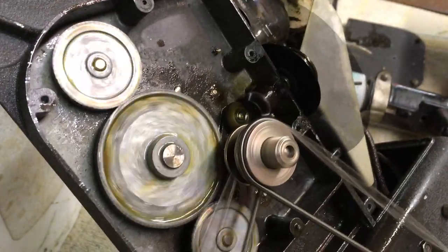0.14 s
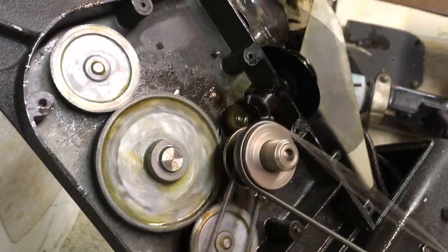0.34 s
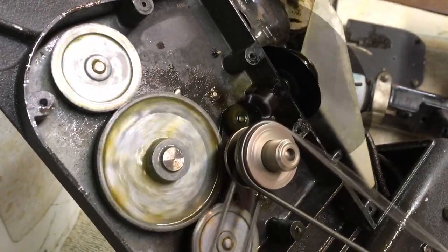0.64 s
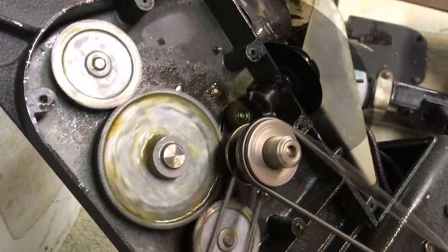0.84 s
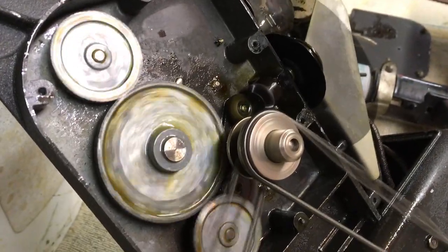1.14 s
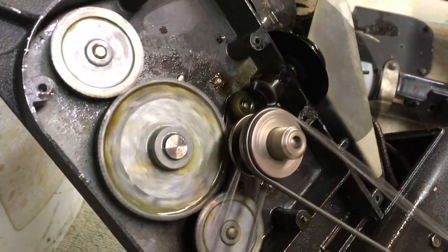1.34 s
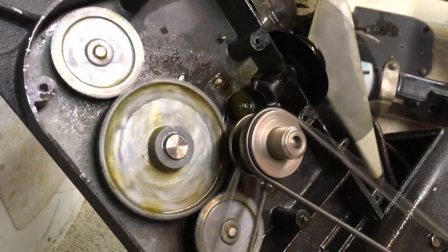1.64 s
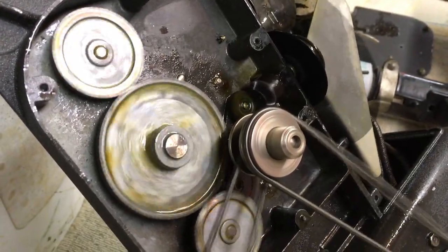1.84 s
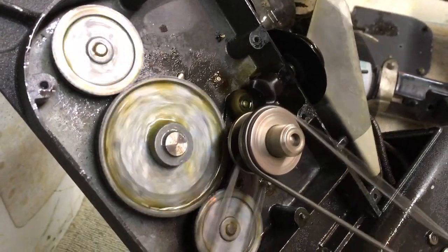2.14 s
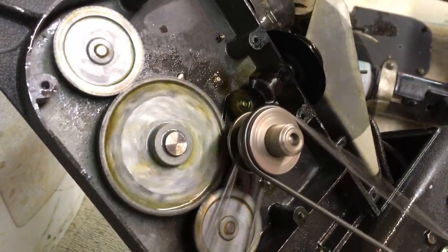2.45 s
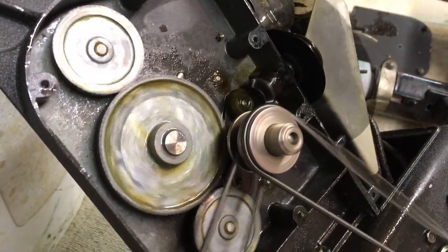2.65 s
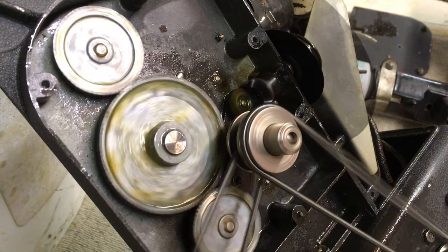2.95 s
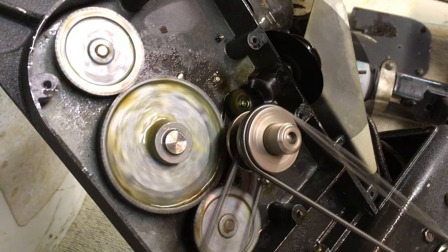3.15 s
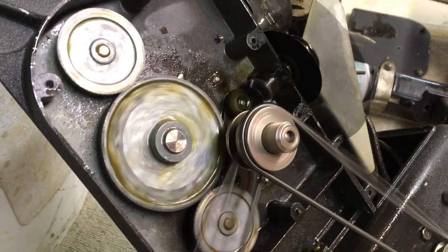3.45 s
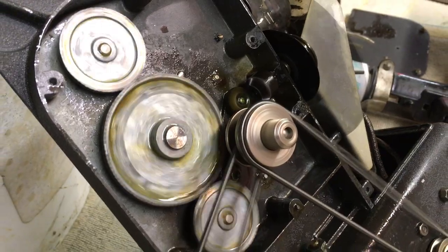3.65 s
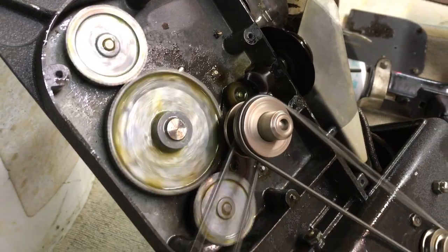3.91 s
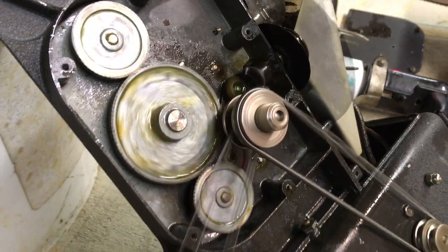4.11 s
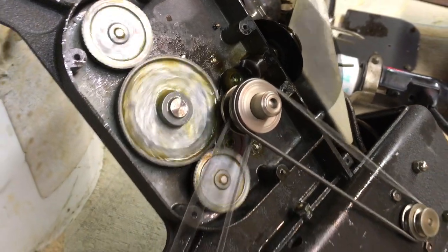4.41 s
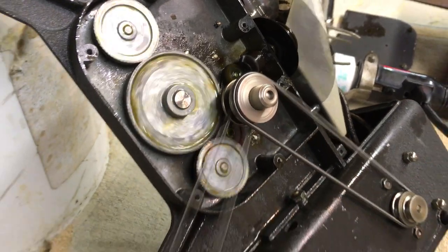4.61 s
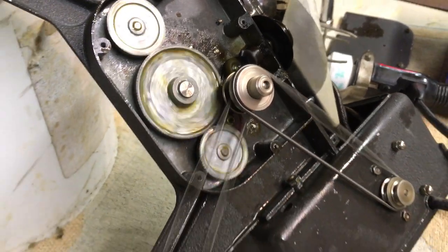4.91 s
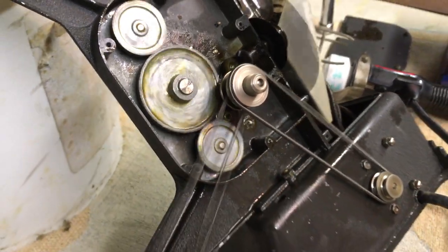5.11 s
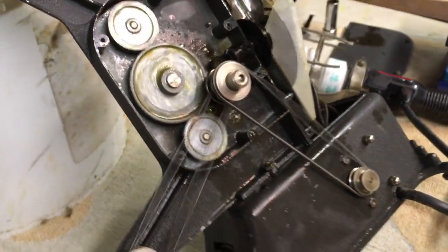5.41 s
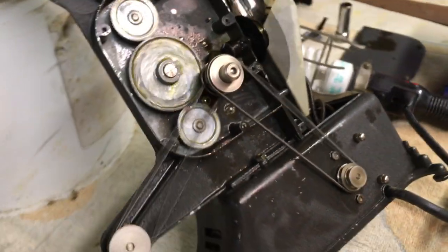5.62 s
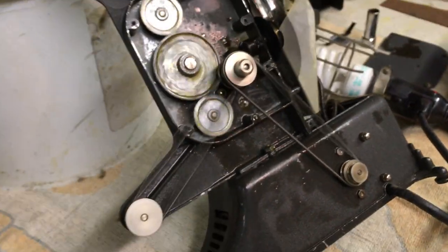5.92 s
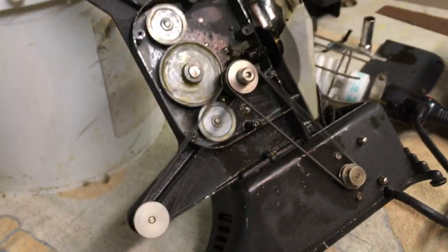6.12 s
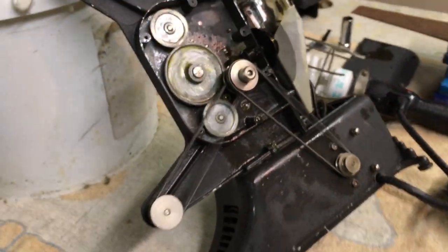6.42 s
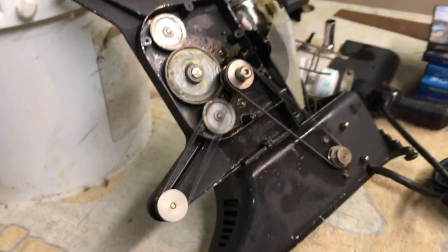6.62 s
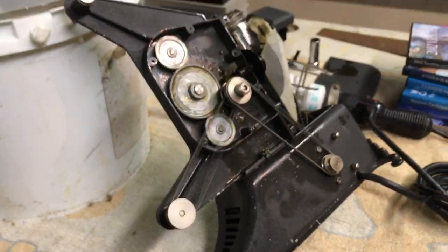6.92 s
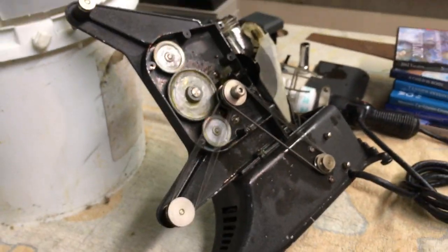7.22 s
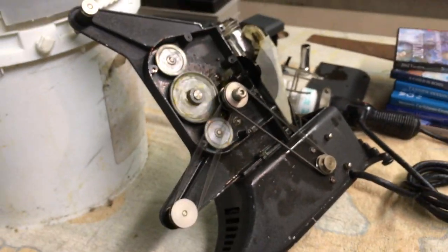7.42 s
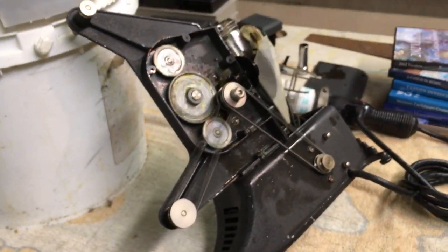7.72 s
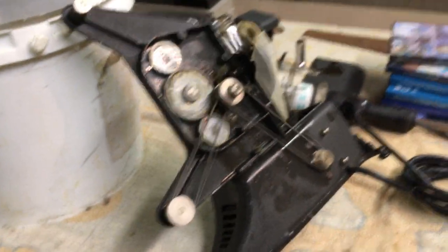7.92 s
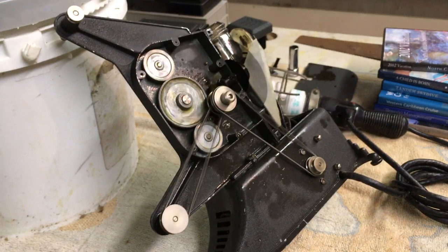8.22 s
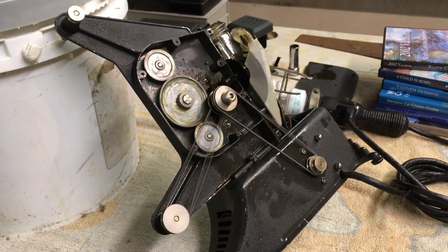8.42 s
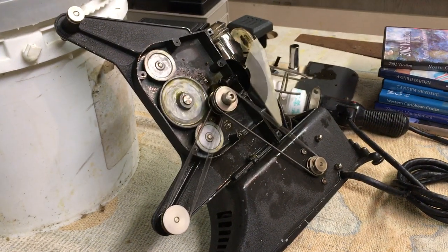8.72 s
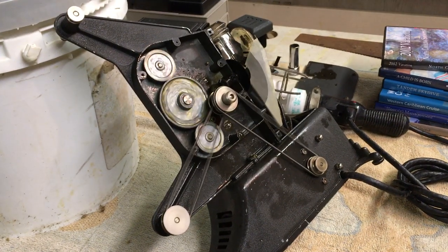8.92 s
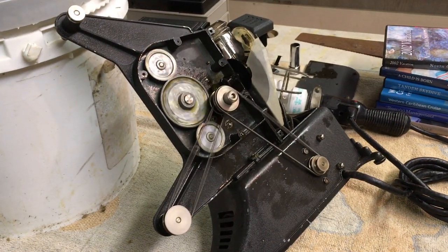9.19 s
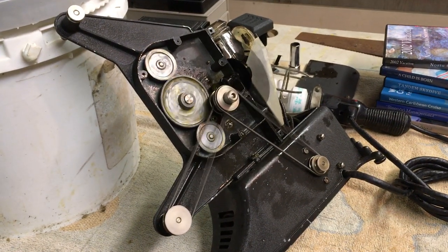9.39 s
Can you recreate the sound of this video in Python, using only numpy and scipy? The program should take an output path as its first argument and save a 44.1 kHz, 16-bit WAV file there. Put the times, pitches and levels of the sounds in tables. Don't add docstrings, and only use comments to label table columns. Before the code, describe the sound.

Fast steady metallic chatter of a bare projector mechanism, with low rumble and faint hum, heard close, then from slightly farther off in a room.

```python
import sys
import numpy as np
from scipy import signal
from scipy.fft import rfft, irfft
from scipy.io import wavfile

SR = 44100
rng = np.random.default_rng(int(sys.argv[2]) if len(sys.argv) > 2 else 0)


def attenuation_scalar(level_db):
    decades = np.asarray(level_db, float) / 20
    return 10 ** decades


def waveform_to_disk(signal):
    frames = np.transpose(np.atleast_2d(signal))
    scaled = np.clip(frames, -1, 1) * 32767
    samples = np.round(scaled).astype(np.int16)
    wavfile.write(sys.argv[1], SR, samples)


N = 421149

# t/s, position/turns
SHAFT_TURNS = [(0.0, -0.221), (0.5, 7.207), (0.75, 10.97), (1.75, 25.857), (2.75, 40.661), (3.25, 47.971),
               (3.75, 55.37), (4.0, 59.025), (5.0, 73.818), (6.0, 88.7), (6.25, 92.47), (6.75, 100.083),
               (7.25, 107.618), (7.5, 111.436), (8.25, 122.818), (9.25, 138.046), (9.55, 142.67)]
# place/turns, then the strength into
# frame level/dB, gear discs level/dB, levers level/dB, claw and springs level/dB
LOBE_KNOCKS = [(0.031, -8, 2, 6, 6), (0.040, 2, 6, 4, 4), (0.077, 1, 4, 3, 4), (0.138, 1, 1, 5, 3),
               (0.165, 2, 2, -1, -7), (0.269, -4, -1, 4, -4), (0.293, -2, 1, 1, -4),
               (0.324, 2, -4, -13, -10), (0.386, -4, 1, 4, 1), (0.402, 3, 4, 1, 2), (0.451, -3, -8, 2, -2)]
# t/s, view/steps (0 close above, 1 swinging off, 2 half way, 3 far)
MIC_VIEW = [(0, 0.), (2, 0.), (3.2, .1), (4, .3), (4.7, 1.), (5., 1.1), (5.3, 1.4), (5.8, 2.), (6.4, 2.1),
            (7.1, 3.), (9.55, 3.)]
# contact lead over the loudest ringing t/s, chatter t/s,
# share of chatter repeated every turn/0-1
PART_CHATTER = [
    (.0013, .0008, .4),
    (.0011, .0008, .8),
    (.001, .0007, .8),
    (.0007, .0011, .7),
    (.0007, .0009, .5),
]
PART_RUB = [-4, -18, -20, -23, -32]
# f/Hz, width/Hz, then level/dB heard from each of the four microphone positions
FRAME_RINGS = [(1148, 72, -100, -75.5, -70, -75.5), (1517, 163, -64.5, -67.5, -72, -74.5),
               (1767, 230, -66, -61, -60, -64), (2143, 410, -66.5, -66.5, -67, -68)]
GEAR_RINGS = [(2463, 60, -61.5, -61.5, -65, -64.5), (2673, 257, -59, -61.5, -63.5, -63),
              (3069, 400, -55, -56.5, -60, -62.5), (3426, 117, -65, -67, -61.5, -62),
              (3610, 235, -64, -70, -65, -65), (4092, 500, -57.5, -58.5, -63.5, -62.5),
              (4404, 220, -54, -59, -60.5, -69.5), (4620, 255, -62.5, -61.5, -67, -66.5)]
LEVER_RINGS = [(5383, 560, -61, -61.5, -61, -64.5), (5740, 237, -58, -61.5, -61.5, -58.5),
               (6088, 300, -56, -54.5, -60.5, -59.5), (6580, 500, -66.5, -70, -66.5, -70)]
CLAW_RINGS = [(7393, 720, -60.5, -63, -66.5, -67), (8365, 920, -67, -69, -71, -70),
              (9590, 1280, -68, -68.5, -69.5, -69), (10080, 400, -63.5, -70, -65.5, -68)]
SPRING_RINGS = [(10650, 970, -69.5, -73, -69.5, -73), (11560, 750, -58, -58, -66, -62.5),
                (12960, 1500, -67, -62.5, -63.5, -66), (12870, 640, -57, -63.5, -72, -67),
                (13500, 380, -82, -81, -76, -69), (14000, 600, -75, -74, -73, -78),
                (14140, 360, -73, -76, -79, -80), (15200, 460, -68.5, -68, -69, -66.5),
                (15700, 600, -70, -69, -76, -68)]
# f/Hz, level per Hz/dB
RUMBLE_COLOUR = [(15, -43), (25, -41), (49, -4.5), (90, -11), (129, 1), (206, -3.5), (236, -2), (270, -7.5),
                 (356, -4.5), (468, -13), (694, -6.5), (796, -1.5), (913, -10.5), (1350, -5), (1500, -5.5),
                 (1950, -2), (3300, -120)]
# f/Hz, rms level/dB, waver/Hz
HUM_TONES = [(46.6, -62, .4), (240, -54, .2), (818.6, -58, .7),
             (120.7, -59.5, 1.56), (140.2, -56.5, 3.3), (166.6, -59, 3.73), (361, -65.5, 4.27)]
# t/s, level/dB, start f/Hz, end f/Hz
HAND_BUMPS = [
    (7.712, -50, 610, 595),
    (7.838, -39.5, 95, 60),
]

CLATTER_DB = -21
BLOW_END_TURNS, SECOND_LATE_TURNS, SECOND_DB = .1, .010, 2.0
RETURN_DB = 5.5
SPRING_REST_DB = -4.5
RUMBLE_DB, RUMBLE_LOSS_DB = -41, 1.15


def evened(x):
    return x / np.sqrt(np.mean(x ** 2) + 1e-20)


def curve(rows, column=1):
    rows = np.asarray(rows, float)
    return np.interp(np.arange(N) / SR, rows[:, 0], rows[:, column])


def slow(rate_hz):
    low = signal.butter(2, rate_hz, fs=SR, output="sos")
    return evened(signal.sosfilt(low, rng.standard_normal(N + SR))[SR:])


def ring(x, hz, width):
    sos = signal.tf2sos(*signal.iirpeak(hz, hz / width, fs=SR))
    return signal.sosfilt(np.vstack([sos, sos]), x)


def cam():
    first = np.array(LOBE_KNOCKS, float)[:, [0, 1, 2, 3, 4, 4]]
    blow = first[:, 0] < BLOW_END_TURNS
    order = np.arange(len(first))
    first[:, -1] += SPRING_REST_DB * ~blow
    second_place = .5 + first[:, 0] + SECOND_LATE_TURNS * blow * (order > 0)
    harder_db = SECOND_DB * blow + RETURN_DB * (order == order[-1])
    place = np.concatenate([first[:, 0], second_place])
    strength_db = np.vstack([first[:, 1:], first[:, 1:] + harder_db[:, None]])
    return place, strength_db


def contacts(play_s=.00008, uneven_db=.4):
    s, turns = np.transpose(SHAFT_TURNS)
    place = np.arange(-1, np.ceil(turns[-1]))[:, None] + cam()[0]
    luck = rng.standard_normal(place.shape + (2,))
    running = (place > turns[0]) * (place < turns[-1])
    gain = attenuation_scalar(uneven_db * luck[..., 1]) * running
    when = np.interp(place, turns, s) + play_s * luck[..., 0]
    return when, gain


def drive(size=320):
    when, gain = contacts()
    after = np.arange(size)
    worn = evened(rng.uniform(-1, 1, (when.shape[1], size)))
    fresh = evened(rng.uniform(-1, 1, when.shape + (size,)))
    forces = []
    for (lead, chatter, same), knock_db, rub_db in zip(PART_CHATTER, cam()[1].T, PART_RUB):
        rebounds = same * worn + np.sqrt(1 - same ** 2) * fresh
        rebounds = rebounds * np.exp(-after / (2 * chatter * SR))
        rebounds *= 1 - .6 * np.exp(-after / (.0002 * SR))
        rebounds[..., 0] = 1
        start = np.round((when - lead) * SR).astype(int)
        at = np.clip(start[..., None] + after, 0, N)
        hits = rebounds * (gain * attenuation_scalar(knock_db))[..., None]
        knocks = np.bincount(at.ravel(), hits.ravel(), N + 1)[:N]
        rub = attenuation_scalar(rub_db) * rng.standard_normal(N)
        forces.append(evened(knocks) + rub)
    return forces


def clatter():
    view = curve(MIC_VIEW)
    out = np.zeros(N)
    face = 0
    parts = [FRAME_RINGS, GEAR_RINGS, LEVER_RINGS, CLAW_RINGS, SPRING_RINGS]
    for front, back, rings in zip(drive(), drive(), parts):
        forces = [evened(front), -evened(back)]
        for hz, width, *dbs in rings:
            heard_db = np.interp(view, np.arange(len(dbs)), dbs)
            out += attenuation_scalar(heard_db) * ring(forces[face], hz, width)
            face = 1 - face
    return attenuation_scalar(CLATTER_DB) * out / out[:2 * SR].std()


def room(x, t60=.25, dull_hz=3500.):
    taps = np.zeros(SR // 2)
    at = np.arange(200, len(taps) - 20, 20)
    sign = rng.choice([-1., 1.], len(at))
    taps[at + rng.integers(0, 20, len(at))] = sign * attenuation_scalar(-60 * at / SR / t60)
    taps /= np.linalg.norm(taps)
    dull = signal.lfilter(*signal.butter(1, dull_hz, fs=SR), taps)
    return signal.oaconvolve(x, dull)[:N]


def rumble():
    f, db = np.transpose(RUMBLE_COLOUR)
    hz = np.fft.rfftfreq(N, 1 / SR)
    colour = attenuation_scalar(np.interp(np.log(hz + 1), np.log(f + 1), db, left=-60, right=-60))
    noise = evened(irfft(rfft(rng.standard_normal(N)) * colour, N))
    level_db = RUMBLE_DB - RUMBLE_LOSS_DB * curve(MIC_VIEW) + 0.6 * slow(4.6)
    return attenuation_scalar(level_db) * noise


def hum():
    tones = np.zeros(N)
    for hz, db, waver in HUM_TONES:
        level = attenuation_scalar(db + 0.99 * slow(5.8))
        phase = 2 * np.pi * np.cumsum(hz + waver * slow(4.67)) / SR
        tones += level * np.sin(phase)
    return np.sqrt(2) * tones * attenuation_scalar(-.5 * curve(MIC_VIEW))


def bump(s, db, start_hz, end_hz):
    t = np.maximum(np.arange(N) / SR - s, 0)
    hz = end_hz + (start_hz - end_hz) * np.exp(-t / 0.011)
    swell = t / 0.011 * np.exp(1 - t / 0.014)
    return attenuation_scalar(db) * swell * np.sin(2 * np.pi * np.cumsum(hz * (t > 0)) / SR)


def scene():
    knocks = clatter()
    wet = attenuation_scalar(-23 + 1.5 * curve(MIC_VIEW))
    bumps = sum(bump(*row) for row in HAND_BUMPS)
    mix = knocks + wet * room(knocks) + rumble() + hum() + bumps
    return mix[None]


def top_cut(x):
    return signal.sosfilt(signal.butter(12, 16990, fs=SR, output="sos"), x)


def record(dry):
    rounded = .9 * np.tanh(dry / .9)
    edge = signal.firwin(1023, 15810, window=("kaiser", 11), fs=SR)
    mix = signal.oaconvolve(rounded, edge[None], "same")
    return top_cut(mix)


dry = scene()
out = record(dry)
waveform_to_disk(out)
```